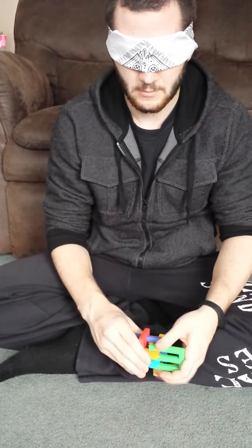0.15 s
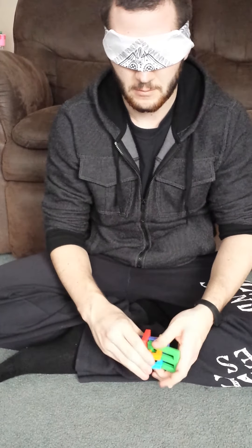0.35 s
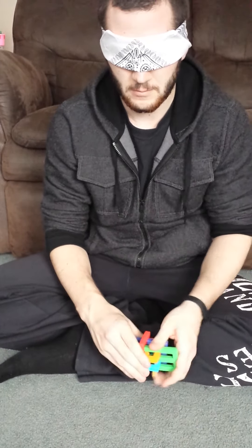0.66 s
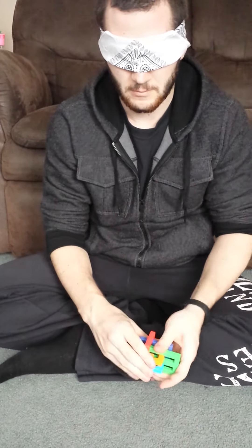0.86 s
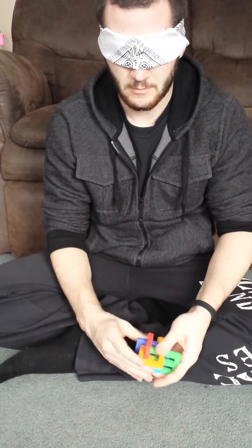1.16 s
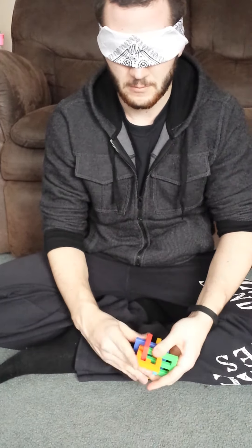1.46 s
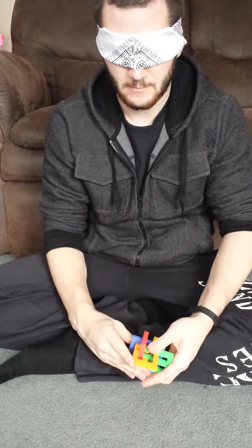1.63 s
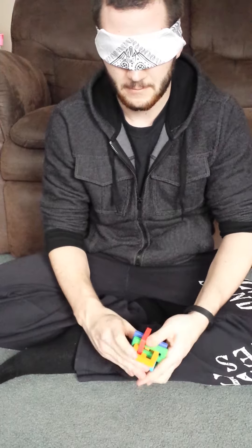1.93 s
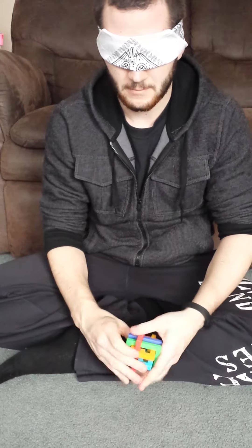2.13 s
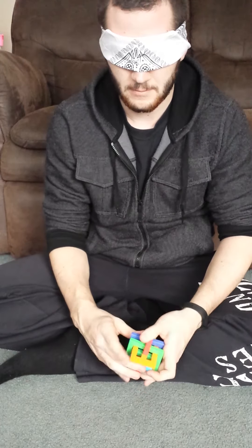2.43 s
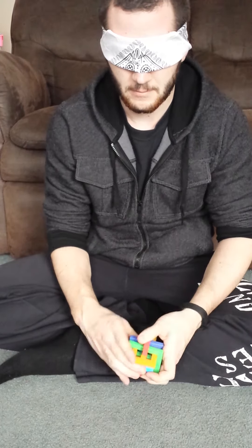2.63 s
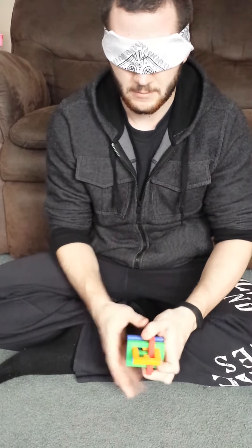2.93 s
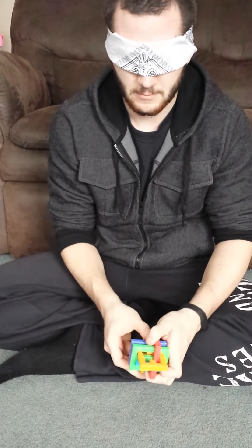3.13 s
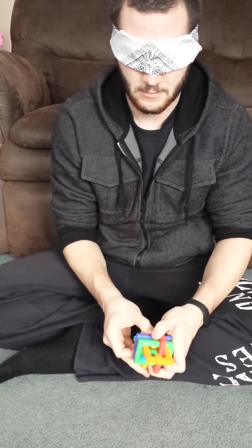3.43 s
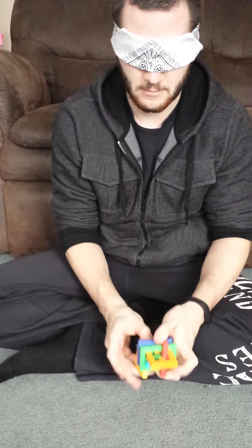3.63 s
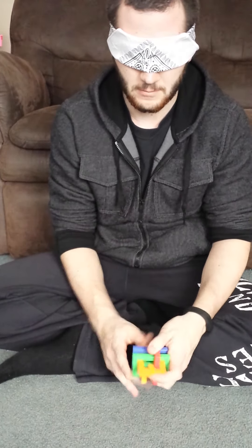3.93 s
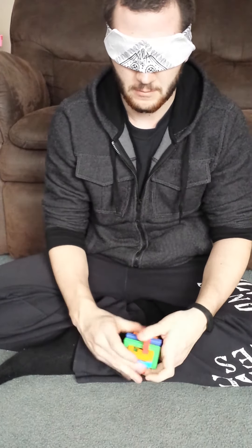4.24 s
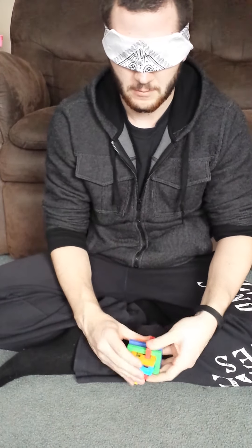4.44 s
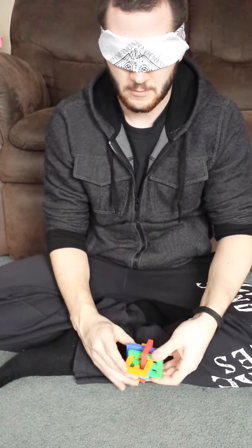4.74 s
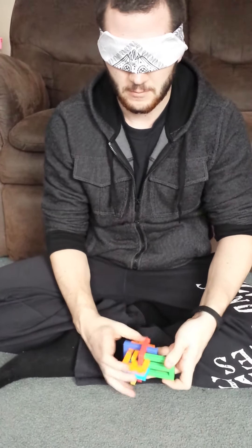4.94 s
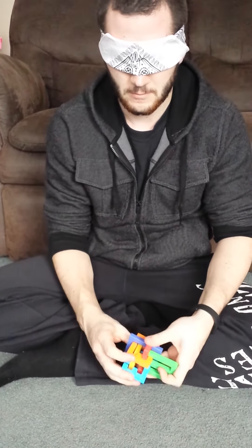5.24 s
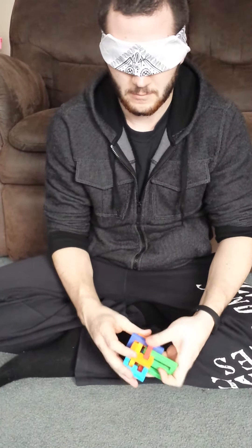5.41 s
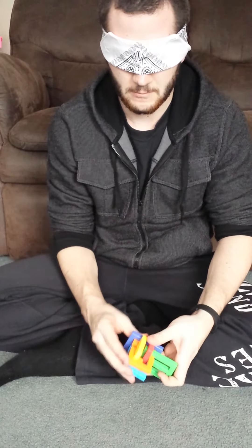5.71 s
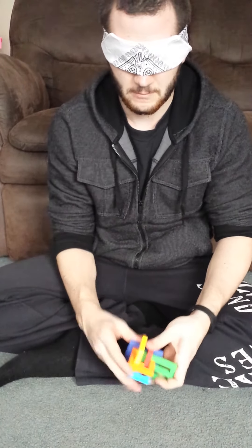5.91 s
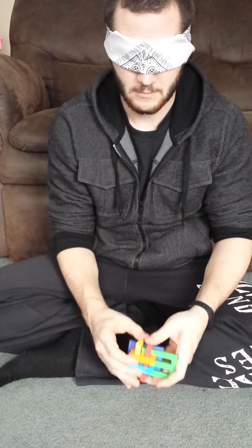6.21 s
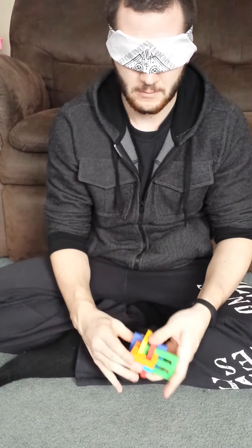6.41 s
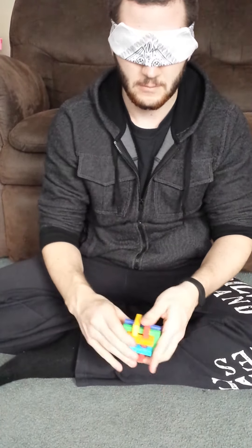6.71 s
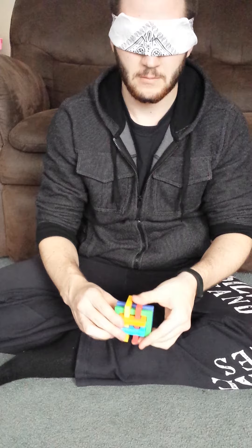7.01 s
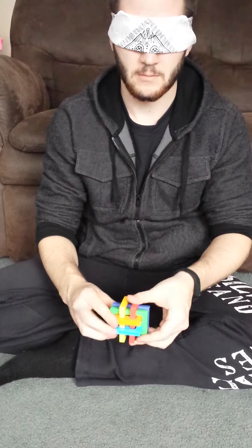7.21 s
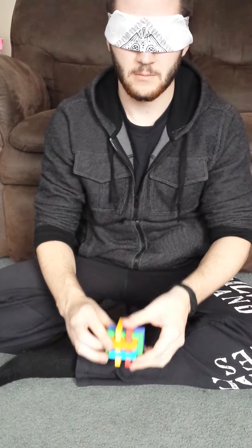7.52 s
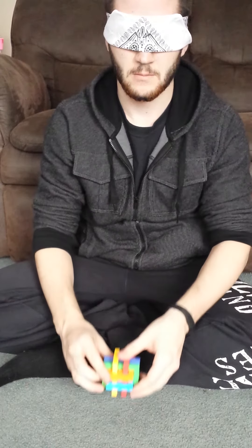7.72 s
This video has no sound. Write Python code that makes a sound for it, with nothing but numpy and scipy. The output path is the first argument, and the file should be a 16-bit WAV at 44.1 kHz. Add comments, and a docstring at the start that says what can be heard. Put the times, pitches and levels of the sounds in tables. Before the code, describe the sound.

Close by, hands turn a small interlocking plastic puzzle in a quiet carpeted living room. Scattered soft clicks come first, then sharper, irregular clacks with light rattling and faint skin and cloth rustle. The knocks grow denser and strongest after six seconds, then stop almost at once, leaving soft hiss. The stereo is uneven, with crisper knocks on the right and duller room sound on the left.

```python
"""Hands slide and turn the pieces of a plastic interlocking puzzle in a quiet carpeted living room.
It opens with scattered soft knocks over rustle and rattle; the knocks grow strongest just after 6 s, then
thin out into room tone. Each knock is a ring of a few milliseconds shaped by the modes of the plastic;
the room answers after a short gap and dies fast. Two unlike microphone capsules hear it: the right faces
the hands, the left hears the knocks later, weaker and duller, and gets mostly the room."""
import sys
import numpy as np
from scipy import signal
from scipy.fft import rfft, irfft, next_fast_len
from scipy.io import wavfile
from scipy.ndimage import uniform_filter1d

SR = 44100
rng = np.random.default_rng(int(sys.argv[2]) if len(sys.argv) > 2 else 0)


def master_out(mix):
    """Clip the mix to full scale and print it as 16-bit PCM to the path in sys.argv[1]."""
    frames = np.transpose(np.atleast_2d(mix))
    ceiling = np.clip(frames, -1, 1)
    pcm = np.round(ceiling * 32767).astype(np.int16)
    wavfile.write(sys.argv[1], SR, pcm)


N = 346626   # length in samples
PLACES = 6   # spots where the puzzle is held or turned, each with reflections of its own

# Knocks of piece on piece: start_s [s], level_db [dB, peak before the capsule difference],
# pitch_hz [Hz, struck bar], ring_db [dB, that bar's prominence], treble_db [dB per octave above 5 kHz],
# room_db [dB, energy sent to the room, relative to level_db]
KNOCK_EVENTS = [(0.035, -47, 4250, -5, -22, -9), (0.2395, -49.5, 4640, 14, 8, 0),
                (0.2557, -28.5, 3230, 6, -6, -3), (0.267, -20, 4540, 2, -0.5, -4.5),
                (0.3863, -30, 3340, 6, 0, -8), (0.6413, -33, 2120, 18, -0.5, -2),
                (0.6745, -29.5, 2160, 3, -1, -3), (0.8654, -31.5, 4870, -19, -4.5, 1.5),
                (0.972, -35.5, 5300, 6, -8, -4), (1.1358, -40, 3700, 5, 7, -16),
                (1.1997, -34, 4780, -9, -3, -3.5), (1.2303, -14.5, 3380, 12, 3, -4.5),
                (1.4572, -39.5, 4830, 6, -3, -4), (1.5656, -58, 3430, 13, 8, 3),
                (1.5805, -47.5, 4200, -7, -14, -3.5), (1.675, -36, 3450, 7, -12, -24),
                (1.7036, -47.5, 4100, 10, 8, -5.5), (1.7583, -52.5, 2410, 4, -9, -2),
                (1.923, -24, 3100, 6, 2.5, 0), (2.0292, -31, 3500, -1, -5, -6),
                (2.1889, -15, 5690, 32, 3, -4), (2.1917, -11, 3340, 9.5, 4.5, -5),
                (2.3068, -25.5, 4800, 2, -0.5, -5.5), (2.337, -31.5, 3160, 4, -7, -5),
                (2.3879, -27.5, 5950, 1, -3, -2), (2.4018, -10.5, 5540, 9.5, 2, -4),
                (2.6346, -42.5, 4070, 6, -10, -6), (2.711, -34.5, 3350, 8, -1, -2),
                (2.7409, -16.5, 5800, 6, -3, -4), (2.7927, -9, 3540, 9, 0.5, -4),
                (2.9383, -26, 5030, -11, -6, -5.5), (2.961, -30.5, 3900, -8, 2, -18),
                (3.0668, -37, 4550, -6, -5.5, -5.5), (3.1222, -50, 4250, 10, -14, -7),
                (3.2864, -12, 4020, 3, -4, -5), (3.3875, -22, 2960, -5, -6, -3.5),
                (3.4268, -25, 2360, 12.5, -0.5, -2), (3.5445, -21.5, 2580, 5, -9, -8),
                (3.5636, -10.5, 5300, 4, -2, -6), (3.779, -36.5, 6500, -11, -4.5, 0),
                (3.891, -47.5, 5620, 5, -8, -5), (3.919, -38.5, 5500, 7, -12, -8),
                (3.9952, -45, 5440, -2, -3, -0.5), (4.031, -34.5, 5500, 3, -1, -4),
                (4.041, -25, 2830, 9.5, -5, -5.5), (4.163, -48, 2460, 13, -17, -11),
                (4.2714, -25, 3540, 7, 2.5, 0.5), (4.3143, -9.5, 5130, 5, -0.5, -5),
                (4.483, -43, 4520, 4, -18, -7.5), (4.566, -41, 4820, 12, -2, -3),
                (4.6058, -43, 3550, 4, -4, 5), (4.6676, -19, 5500, 7, -3, -5),
                (4.847, -34, 3580, 6, -7.5, -2), (4.8561, -36.5, 5750, 14, -16, -14),
                (4.931, -33, 4970, 9, 2, -5), (4.9992, -19, 5260, 4, 0.5, -1.5),
                (5.1001, -19.5, 5800, -12, -0.5, -2.5), (5.1394, -7.5, 5250, 5, 2.5, -4),
                (5.345, -24.5, 8740, 10, -2, 7), (5.3563, -3.5, 6500, 11, 1, -3.5),
                (5.462, -11.5, 3920, -0.5, 1.5, -4.5), (5.5889, -28.5, 3560, 10, 8, -7.5),
                (5.6029, -5, 5370, -5, -0.5, -3.5), (5.758, -37.5, 3550, 8, -7, -5.5),
                (5.7935, -17.5, 6280, 0, 2.5, -5.5), (5.8316, -17.5, 2110, 10.5, -2, -5.5),
                (5.9666, -27.5, 5820, -9, -7, 3.5), (5.9834, -12.5, 5700, 5, -2, -7.5),
                (6.0395, -2.5, 6500, 5, 2.5, -3.5), (6.211, -29, 5000, 2.5, -0.5, -3.5),
                (6.2232, -17.5, 5400, 9, 13, -5), (6.2263, -1.5, 6070, 11, 6.5, -2.5),
                (6.338, -28, 6100, -8, -4, -4), (6.4443, -28, 5850, 2, -28, -3),
                (6.4514, -8.5, 6200, 5.5, -2, -5), (6.557, -20.5, 4600, 9, -6, -2),
                (6.6006, -10.5, 5880, 1.5, -0.5, -2.5), (6.7005, -27.5, 2500, 4, -2, -4.5),
                (6.7462, -8, 3480, 11.5, 3, -3), (7.021, -51, 4760, 9, -1, -3),
                (7.2492, -56, 5270, 5, -1, -3), (7.7494, -60, 3110, 6, -5.5, -4.5)]


def knocks():
    """Impact excitation: each blow gives direct sound at both capsules and a ring sent out to the room."""
    start_s, level_db, pitch_hz, ring_db, treble_db, room_db = np.transpose(KNOCK_EVENTS)
    chance = rng.standard_normal((len(start_s), 2))
    body_db = np.minimum(2.0 - 0.09 * level_db, 8)   # dB per octave; harder knocks are thinner
    pan_db = -7 + 2.5 * chance[:, 0]   # left minus right, as the hands shade the pieces
    # a second, weak emphasis near 5 kHz, drawn by chance for each knock
    second_hz = 5000 + 600 * chance[:, 1]
    second_db = np.full(len(start_s), -2.5)
    rings = strike([pitch_hz, second_hz], treble_db, body_db, favour_db=[ring_db, second_db], scatter_db=2.)

    left, right, sent = np.zeros(N), np.zeros(N), np.zeros((PLACES, N))
    add(left, contact(rings) * amp(level_db + pan_db / 2)[:, None], start_s + 0.001)   # further away
    add(right, contact(rings) * amp(level_db - pan_db / 2)[:, None], start_s)
    to_room = rings * amp(level_db + room_db)[:, None]
    for place in range(PLACES):   # the knocks take the places in turn
        add(sent[place], to_room[place::PLACES], start_s[place::PLACES])
    left = signal.lfilter(*signal.butter(1, 9000, fs=SR), left)   # and shaded from the treble
    return np.stack([left, right]), sent


# Modes of a piece: mode_hz [Hz], level_db [dB, before scatter and tilt], t60_s [s, sets the peak width]
PIECE_MODES = [(880, -29, 0.007), (1458, -21.5, 0.0048), (1720, -20.5, 0.012), (2000, -19.5, 0.0056),
               (2443, -8, 0.006), (3190, -7.5, 0.002), (3650, -6, 0.0032), (4130, -1.5, 0.0057),
               (4713, 0, 0.0044), (5360, 2, 0.007), (5560, -3.5, 0.0017), (6065, 1.5, 0.0041),
               (6393, 3.5, 0.0094), (7100, 1, 0.0022), (8150, -2, 0.002), (8760, -2, 0.006),
               (9674, -6.5, 0.0012), (11600, -14.5, 0.00069), (13180, -12.5, 0.006), (13480, -19.5, 0.0023)]


def strike(pitch_hz, treble_db, body_db, favour_db, scatter_db):
    """Modal superposition: each mode beams its own way, so over all directions the modes add in power.

    The favoured pitches are emphasised; each blow becomes one minimum-phase ring of energy 1."""
    mode_hz, level_db, t60_s = np.transpose(PIECE_MODES)
    f = np.arange(1025) * SR / 2048 + 1   # 1 Hz up keeps clear of zero
    chance = rng.standard_normal((len(body_db), 2, len(mode_hz)))
    held_hz = mode_hz * (1 + 0.034 * chance[:, 0])   # the grip detunes each mode a little
    width_hz = np.log(1000) / (2 * np.pi * t60_s)   # the faster the loss, the broader the peak
    detuning = (f - held_hz[:, :, None]) / width_hz[:, None]
    peaks = 1 / (1 + detuning ** 2) ** 2
    mode_power = amp(2 * (level_db + scatter_db * chance[:, 1]))
    power = np.einsum("em,emf->ef", mode_power, peaks)   # event, mode, frequency
    for favoured_hz, favoured_db in zip(pitch_hz, favour_db):
        away = (f / favoured_hz[:, None] - 1) / 0.038
        power *= 1 + amp(2 * favoured_db)[:, None] / (1 + away ** 2)

    octaves = np.log2(np.clip(f, 1000, 14000) / 5000)
    tilt_db = np.where(octaves > 0, treble_db[:, None] * octaves, -body_db[:, None] * octaves)
    # folding the cepstrum gives minimum phase: nothing rings before the blow
    cepstrum = irfft(np.log(np.sqrt(power) * amp(tilt_db)))
    cepstrum[:, 1:1024] *= 2
    cepstrum[:, 1025:] = 0
    rings = irfft(np.exp(rfft(cepstrum)))[:, :900]
    return rings / np.sqrt(np.sum(rings ** 2, axis=1, keepdims=True))


def contact(rings):
    """Convolution: rough faces touch at many points within a millisecond, lap and floor throw it back.

    Stands for one direction; scaled to peak 1."""
    t = np.arange(400) / SR
    touches = (t / 0.00072) * np.exp(-t / 0.00069)
    thrown_back = amp(-7.0) * np.exp(-t / 0.0059)
    grain = rng.standard_normal((len(rings), len(t))) * (touches + thrown_back)
    out = signal.fftconvolve(rings, grain, axes=1)
    return out / np.abs(out).max(axis=1, keepdims=True)


# Dull taps of fingers and pieces on the hollow stack: start_s [s], level_db [dB, before the bass cut and
# capsule difference], pitch_hz [Hz], loss_db [dB per cycle, held to 6-40 in use]
THUD_EVENTS = [(0.269, -49.5, 330, 5.5), (0.867, -45, 900, 13), (0.653, -29, 736, 32), (1.23, -38, 860, 16),
               (1.674, -32, 745, 16), (1.923, -48, 745, 2), (2.401, -40, 334, 0), (2.738, -43.5, 342, 8),
               (2.792, -36, 837, 15), (2.937, -47.5, 353, 4), (3.287, -44.5, 330, 4.5),
               (3.561, -41.5, 304, 18), (4.041, -42, 363, 14), (4.315, -35, 860, 2.5),
               (4.715, -27.5, 226, 35), (5.031, -31.5, 680, 20), (5.097, -43.5, 1072, 11),
               (5.179, -51.5, 238, 3), (5.352, -42.5, 813, 4.5), (5.46, -32.5, 358, 15),
               (5.602, -35, 308, 4), (5.792, -44.5, 754, 5.5), (5.835, -42.5, 320, 7),
               (5.979, -44, 331.6, 11), (6.037, -39, 764, 10.5), (6.445, -37, 345, 4), (6.743, -43, 346, 6)]


def thuds():
    """Damped oscillation: a sudden low ring, gone in a few cycles."""
    start_s, level_db, pitch_hz, loss_db = np.transpose(THUD_EVENTS)
    t = np.arange(int(.05 * SR)) / SR
    cycles = pitch_hz[:, None] * t
    swing = np.sin(2 * np.pi * cycles + 0.89)
    decay = amp(level_db[:, None] - np.clip(loss_db[:, None], 6, 40) * cycles)
    out = np.zeros(N)
    add(out, decay * swing, start_s + 0.0026)
    return signal.lfilter(*signal.butter(2, 210, "high", fs=SR), out)   # a small body radiates no bass


# How busy the hands are: time_s [s], rustle_db [dB, skin and cloth, before the capsule difference],
# rattle_db [dB, loose pieces, before the capsule and room gains]
HAND_ACTIVITY = [(0.0, -72.5, -69), (0.44, -62, -58), (0.8, -66.5, -63), (1.16, -64, -50.5),
                 (1.73, -69, -74), (2.1, -65, -59.5), (2.39, -56.5, -43), (2.55, -66, -65),
                 (2.91, -57.5, -42), (3.15, -68.5, -68), (3.48, -59, -44), (3.74, -64.5, -65),
                 (4.6, -63, -56.5), (5.06, -59.5, -42), (5.3, -62.5, -55), (5.87, -60, -56.5),
                 (6.4, -61.5, -43), (6.94, -66, -68), (7.33, -73.5, -78.5), (7.86, -76, -82)]


def hand_levels():
    """Amplitude envelopes: levels of rustle and rattle, read along straight lines in dB."""
    time_s, rustle_db, rattle_db = np.transpose(HAND_ACTIVITY)
    t = np.arange(N) / SR
    return np.interp(t, time_s, rustle_db), np.interp(t, time_s, rattle_db)


def rattle(level_db, count=500):
    """Random impact process: loose pieces tick against each other all the while, most ticks tiny."""
    chance = rng.random((count, 3))
    flat, pitch_hz = np.zeros(count), 3000 * 1.6 ** chance[:, 0]
    rings = strike([pitch_hz], flat, flat, favour_db=[flat], scatter_db=2.5)
    tick_db = -5. * np.log(chance[:, 1:2] + .02)
    out = np.zeros(N)
    add(out, rings * amp(tick_db), chance[:, 2] * N / SR)
    return amp(level_db) * rms_one(out)


# Rustle spectrum: band_hz [Hz], level_db [dB per Hz, relative]
RUSTLE_SPECTRUM = [(18, -49), (30, -3.5), (43, 0), (177, -3.5), (245, -1.5), (445, -8), (1500, -13),
                   (3000, -19.5), (3900, -45.5), (6600, -120)]


def rustle(level_db):
    """Friction noise: skin and cloth rub as patchy coloured noise, stronger on the left."""
    return amp(level_db) * stereo_noise(RUSTLE_SPECTRUM, patchy_db=1.5) * amp([[1.3], [-1.3]])


# Reverberation time: band_hz [Hz], t60_s [s]
ROOM_DECAY = [(500, 0.089), (1500, 0.23), (3500, 0.23), (7000, 0.2), (14000, 0.14)]
# Capsule response to diffuse sound: band_hz [Hz], difference_db [dB, left minus right]
CAPSULE_DIFFERENCE = [(300, -3.5), (1300, 6.5), (3000, 4), (6000, 12.5), (9000, -6.5), (14000, 0)]


def room(sent):
    """Reverberation: reflections start after a gap, fill up, then die band by band.

    Each capsule and each place has its own reflections."""
    t, echo = np.arange(int(.4 * SR)) / SR, 0
    walls = rng.standard_normal((2, PLACES, 2, len(t)))
    walls *= np.abs(walls) ** (0.8 * np.exp(-t / 0.071))   # early reflections stand apart, late ones blur
    for hz, noise in bands(walls):
        side_db = at_hz(CAPSULE_DIFFERENCE, hz) / 2 * np.array([[1], [-1]])
        echo = echo + noise * amp(side_db - 60 * t / at_hz(ROOM_DECAY, hz))
    gap_s = 0.0046 + np.array([[0.0018], [0]])   # the left capsule waits longer for the walls
    fill_s = 0.0058
    echo = echo * (1 - np.exp(-np.clip(t - gap_s, 0, 1) / fill_s))
    echo = amp(19.5) * rms_one(echo) / np.sqrt(len(t))   # mean echo energy 19.5 dB
    size = next_fast_len(N + len(t))
    answer = np.sum(rfft(sent, size)[:, None] * rfft(echo, size), axis=0)   # all places together
    return irfft(answer, size)[:, :N]


# Room tone and capsule hiss: band_hz [Hz], level_db [dB per Hz, relative]
QUIET_SPECTRUM = [(15, -44), (25, -17), (43, -12), (59, -12), (80, -4.5), (102, -13.5), (242, -13.5),
                  (277, -15), (451, -24.5), (714, -14.5), (1700, -28.5), (14000, -20.5), (16000, -35.5)]


def room_tone():
    """Stationary background noise: room tone and capsule hiss, -70.5 dB before the capsule difference."""
    return amp(-70.5) * stereo_noise(QUIET_SPECTRUM, patchy_db=-0.36) * amp([[.7], [-.7]])


# Left-right likeness of noise: band_hz [Hz], correlation [-1 to 1]
LEFT_RIGHT_LIKENESS = [(60, 0.23), (180, 0.52), (550, 0.23), (1650, 0.1), (4970, 0.02), (15000, 0.03)]


def stereo_noise(spectrum, patchy_db):
    """Interaural-style coherence: coloured noise, partly alike in the bass, unrelated in the treble; rms 1."""
    out, together = 0, drift(6)
    for hz, (mid, side) in bands(rng.standard_normal((2, 2, N))):
        alike = np.clip(at_hz(LEFT_RIGHT_LIKENESS, hz), -1, 1)
        gain = amp(at_hz(spectrum, hz) + patchy_db * (1.1 * together + drift(11)))
        out = out + gain * (np.sqrt(1 + alike) * mid + np.sqrt(1 - alike) * side * [[1], [-1]])
    return rms_one(out)


def drift(rate):
    """Low-pass random process: slow chance with spread 1; a higher rate moves faster."""
    per_s = 40   # random points per second
    points = rng.standard_normal(int(N / SR * per_s) + 2)
    smooth = uniform_filter1d(points, size=max(int(per_s / rate), 1))
    return np.interp(np.arange(N) / SR * per_s, np.arange(len(points)), rms_one(smooth))


# Edges of the half-octave bands: edge_hz [Hz]
BAND_EDGES = 25 * 2 ** np.arange(0, 9.6, .5)


def bands(white):
    """Filter bank: half-octave bands taken from two noises in turn, with their centres in Hz."""
    for k, (low, high) in enumerate(zip(BAND_EDGES, BAND_EDGES[1:])):
        band = signal.butter(2, [low, high], "band", fs=SR, output="sos")
        yield np.sqrt(low * high), signal.sosfilt(band, white[k % 2])


def amp(db):
    """Logarithmic level: decibels to gain."""
    return 10 ** (np.asarray(db) / 20)


def rms_one(x):
    """Effective value: scale to rms 1."""
    return x / np.sqrt(np.mean(x ** 2) + 1e-20)


def at_hz(points, hz):
    """Logarithmic pitch scale: read a table on a log-frequency axis."""
    points = np.array(points)
    return np.interp(np.log(hz), np.log(points[:, 0]), points[:, 1])


def add(track, sounds, seconds):
    """Linear superposition: mix one row of sound per event into the track."""
    for sound, s in zip(sounds, seconds):
        i = round(s * SR)
        track[i:i + len(sound)] += sound[:max(N - i, 0)]


def scene():
    """Superposition of direct and reverberant fields: puzzle, hands and room tone."""
    rustle_db, rattle_db = hand_levels()
    direct, sent = knocks()
    ticks, low = rattle(rattle_db), thuds()
    near = direct + ticks * amp([[-22], [-17]]) + low * amp([[1.5], [-1.5]])   # rows: left, right
    sent[0] += amp(-30) * ticks + amp(-26.5) * low
    return near + room(sent) + rustle(rustle_db) + room_tone()


def record(dry):
    """Band limiting and soft saturation: the capsules roll off, peaks are rounded, the top is cut."""
    soft = signal.sosfilt(signal.butter(4, 14300, fs=SR, output="sos"), dry)
    rounded = 1.2 * np.tanh(soft / 1.2)
    return signal.sosfilt(signal.cheby2(14, 100, 16600, fs=SR, output="sos"), rounded)


dry = scene()
out = record(dry)
master_out(out)
```